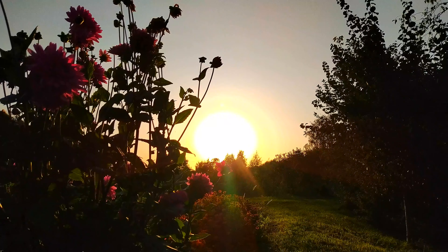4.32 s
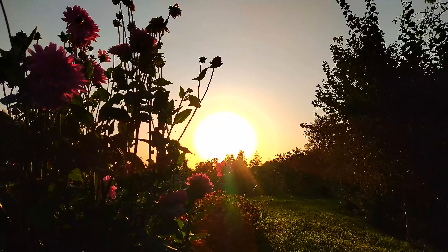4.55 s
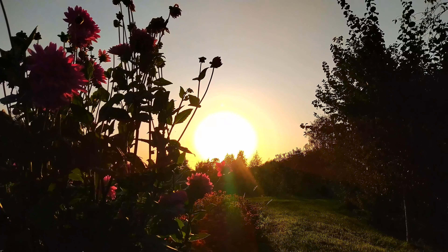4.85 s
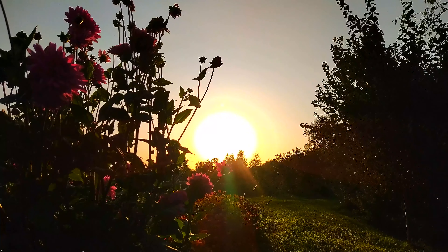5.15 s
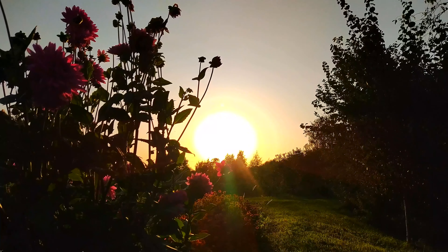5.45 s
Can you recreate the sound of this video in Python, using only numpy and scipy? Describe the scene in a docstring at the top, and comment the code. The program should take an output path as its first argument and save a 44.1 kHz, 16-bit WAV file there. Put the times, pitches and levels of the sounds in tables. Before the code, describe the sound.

A soft outdoor hiss and a faint low rumble run throughout in a garden. For the first second, a distant bird gives short, quiet fluting whistles that linger in the trees. A faint far trill follows from about 1.3 to 1.8 seconds. At 1.7 seconds a small songbird close to the microphone begins fast, high trills and chips, each louder than the last. From 2.5 seconds it sings loudly in quick repeated syllables of arched notes, gives two harsh zips near 3.4 seconds, and finishes with a falling flourish by 3.9 seconds, leaving a short echo. The rumble swells slightly around 3 seconds, then sinks deeper. Distant whistles return from 4.1 to 4.8 seconds, followed by faint trills and thin high calls, ending with a falling whistle near 5.6 seconds. Tiny dry ticks sound close by at about 1.2, 4.4 and 5 seconds.

```python
"""A garden, on one microphone close to a small songbird's perch. The bird sings one loud phrase:
swelling trills, quick repeated syllables of a few short arched notes each, and a flourish.
Other birds whistle and trill further off. Each voice is one gliding tone from the syrinx that the trees
scatter into a long tail. Faint ticks sound close by, over a low distant rumble and a soft hiss."""
import sys
import numpy as np
from scipy import signal
from scipy.fft import rfft, irfft
from scipy.io import wavfile

SR = 44100
rng = np.random.default_rng(int(sys.argv[2]) if len(sys.argv) > 2 else 0)


def file_out(sig):
    """Save sig as 16-bit WAV at sys.argv[1]."""
    # one column per channel
    cols = np.atleast_2d(sig).T
    # limit, then scale
    lim = np.clip(cols, -1, 1)
    pcm = np.round(lim * 32767).astype(np.int16)
    wavfile.write(sys.argv[1], SR, pcm)


N = 251811


def undb(db):
    """Decibels to gain."""
    return 10 ** (np.asarray(db) / 20)


def noise(points):
    """Noise of rms 1, its spectrum shaped by points of (frequency [Hz], level [dB])."""
    hz, db = np.transpose(points)
    bins = np.maximum(np.arange(N // 2 + 1) * SR / N, 1)
    shape = undb(np.interp(np.log(bins), np.log(hz), db))
    shaped = irfft(rfft(rng.standard_normal(N)) * shape, N)
    return shaped / np.sqrt(np.mean(shaped ** 2))


def walk(count, per_s):
    """Smooth random wander of spread near 1."""
    knots = rng.standard_normal(4096)
    return np.interp(np.arange(count) * per_s / SR, np.arange(len(knots)), knots)


def add(track, start, sound):
    """Mix a sound into the track at a time in seconds."""
    i = max(int(start * SR), 0)
    track[i:i + len(sound)] += sound[:N - i]


def swelling(peak_s, width_s):
    """Gain of a distant sound that grows and recedes; it is halved one width from its peak."""
    return 1 / (1 + ((np.arange(N) / SR - peak_s) / width_s) ** 2)


# Spectrum of the open air round the microphone: (frequency [Hz], relative level [dB])
AIR_SPECTRUM = [(20, -4.5), (40, -1.5), (75, 0.5), (120, -2.5), (180, -9), (300, -11.5), (480, -13.5),
                (700, -18.5), (1050, -20), (1500, -26), (3000, -26), (6000, -33), (11000, -34),
                (15800, -36.5)]

def background(air_db=-39, body_db=-37, depth_db=-44.5):
    """Steady outdoor air, and a distant rumble that swells once and then sinks deeper."""
    air = undb(air_db) * noise(AIR_SPECTRUM)
    body = noise([(30, -18), (80, .5), (130, -2), (260, -11.5), (500, -20), (1500, -73), (8000, -80)])
    body *= undb(body_db) * swelling(peak_s=2.89, width_s=.46)
    depth = noise([(18, -7.5), (32, 7), (60, 5), (100, -7), (300, -18), (8000, -90)])
    depth *= undb(depth_db) * swelling(peak_s=4.4, width_s=1.4)
    return air + body + depth


def syrinx(hz, gain, rasp, overtone_db=-45, throat_hz=11400, throat_width_hz=1000, throat_db=13):
    """A nearly pure tone whose pitch shivers; a high throat resonance lifts its weak overtones."""
    shiver = .005 * walk(len(hz), 407) + rasp * walk(len(hz), 2500)
    phase = 2 * np.pi * np.cumsum(hz * (1 + shiver)) / SR
    tone = np.sin(phase)
    for k in range(2, 5):
        throat = 1 + undb(throat_db) / (1 + ((k * hz - throat_hz) / throat_width_hz) ** 2)
        tone += undb(overtone_db) * throat * (k * hz < SR / 2) * np.sin(k * phase) * 2 / k
    soft_edges = signal.windows.tukey(len(hz), min(.0021 * SR / len(hz), 1))
    return np.sqrt(2) * gain * soft_edges * tone


def whistle(length, first_hz, last_hz, rasp, settle_s=.0597, flutter_db=3):
    """One note that glides fast, then settles; it flutters on its way through the leaves."""
    glide = 1 - np.exp(-np.arange(int(length * SR)) / SR / settle_s)
    hz = first_hz + (last_hz - first_hz) * glide / glide[-1]
    flutter = undb(flutter_db * walk(len(hz), 103.5))
    return syrinx(hz, signal.windows.tukey(len(hz), .4) * flutter, rasp)


# Whistles far off in the trees: (time [s], length [s], first pitch [Hz], last pitch [Hz], level [dB])
FAR_WHISTLES = [(0, 0.038, 2292, 2350, -37.5), (0.064, 0.022, 2270, 2730, -44),
                (0.076, 0.14, 2464, 1984, -43.5), (0.212, 0.037, 2780, 2360, -42.5),
                (0.331, 0.089, 2766, 2118, -42.5), (0.434, 0.05, 2200, 1750, -44),
                (0.709, .075, 2860, 2760, -49), (0.824, 0.12, 2848, 2587, -47.5),
                (0.909, 0.065, 2600, 2953, -44), (.975, 0.035, 2707, 2240, -42),
                (4.099, 0.061, 2846, 2790, -46), (4.189, 0.044, 2420, 2150, -39),
                (4.331, 0.044, 2134, 2433, -43.5), (4.436, .04, 2716, 2640, -42),
                (4.462, 0.022, 2530, 2120, -42.5), (4.491, 0.076, 2725, 2510, -43.5),
                (4.699, 0.054, 2780, 2480, -44), (4.731, 0.1, 2393, 2347, -44)]

def far_whistles():
    """A distant bird's short, fluting glides."""
    track = np.zeros(N)
    for start, length, first_hz, last_hz, db in FAR_WHISTLES:
        add(track, start, undb(db) * whistle(length, first_hz, last_hz, rasp=.028))
    return track


def trees(sound, t60, build_s, hold_s, treble_db, patchy_db):
    """Echoes from leaves and trunks: they build up, hold while the nearby trees answer, then die away."""
    t = np.arange(int(1.5 * SR)) / SR
    envelope = (1 - np.exp(-t / build_s)) * undb(-60 * np.maximum(t - hold_s, 0) / t60)
    echoes = rng.standard_normal(len(t)) * envelope * undb(patchy_db * walk(len(t), 299))
    echoes /= np.sqrt(np.sum(echoes ** 2))
    # leaves scatter short waves differently from long ones
    colour = undb(np.interp(np.fft.rfftfreq(len(t), 1 / SR), [3500, 6000], [0, treble_db]))
    return signal.fftconvolve(sound, irfft(rfft(echoes) * colour))[:N]


# Faint ticks close to the microphone: (time [s], relative level [dB])
NEAR_TICKS = [(1.166, -30), (4.406, -27.5), (4.95, -32)]

def ticks(decay_s=.0019):
    """Tiny dry bursts of bright noise that die at once."""
    track = np.zeros(N)
    t = np.arange(SR // 50) / SR
    for start, db in NEAR_TICKS:
        bright = noise([(2000, -20), (7000, -6), (12000, 3), (16000, -2)])[:len(t)]
        add(track, start, undb(db) / 2 * np.exp(-t / decay_s) * bright)
    return track


def trill(length, top_hz, dip_hz, dips_per_s, swell, rasp, dip_width=.19, dip_db=-5):
    """A held note whose pitch dips once a cycle; the dips are deepest in mid-note."""
    progress = np.linspace(0, 1, int(length * SR))
    cycles_from_dip = (progress * length * dips_per_s - .92 + .5) % 1 - .5
    dip = np.exp(-(cycles_from_dip / dip_width) ** 2)
    effort = np.interp(progress, [0, .45, .82, 1], [.3, 1, .98, .385])
    loudness = np.minimum(progress / swell, 1) * np.interp(progress, [.9, 1], [1, .5])
    return syrinx(top_hz - dip_hz * dip * effort, loudness * undb(dip_db * dip), rasp)


# Trills far from the microphone: (time [s], length [s], top pitch [Hz], dip [Hz], dip rate [1/s],
# relative level [dB], swell [share of length])
FAR_TRILLS = [(1.25, .58, 4270, 1180, 38, -54.5, .55), (4.658, .14, 5100, 495, 30, -61.5, .18),
              (4.962, .46, 4540, 950, 25, -56.5, .11)]

def far_trills():
    """Distant trills, loudest at the bottom of each dip in pitch."""
    track = np.zeros(N)
    for start, length, top_hz, dip_hz, dips_per_s, db, swell in FAR_TRILLS:
        call = trill(length, top_hz, dip_hz, dips_per_s, swell, rasp=.052, dip_width=.26, dip_db=7.5)
        add(track, start, undb(db) * call)
    return track


# A smaller bird, also far off: (time [s], length [s], first pitch [Hz], last pitch [Hz], level [dB])
FAR_SEEPS = [(1.398, 0.024, 7550, 7300, -57), (4.873, 0.16, 6300, 6400, -59.5),
             (5.407, .067, 7850, 8500, -58.5), (5.57, 0.086, 5410, 4370, -44)]

def far_seeps():
    """Thin, high whistles, each one glide."""
    track = np.zeros(N)
    for start, length, first_hz, last_hz, db in FAR_SEEPS:
        add(track, start, undb(db) * whistle(length, first_hz, last_hz, rasp=.024))
    return track


# Trills from the near perch: (time [s], length [s], dip [Hz], level [dB], swell [share of length])
OPENING_TRILLS = [(1.735, .1, 650, -43, .55), (1.918, .086, 1050, -29.5, .42),
                  (2.1185, .087, 1250, -21.5, .36), (2.3245, .083, 1100, -17.5, .08)]

def opening_trills(first_top_hz=4944, fall_hz=133, dips_per_s=60.5):
    """The near bird opens with fast trills, each lower and louder than the last."""
    track = np.zeros(N)
    for k, (start, length, dip_hz, db, swell) in enumerate(OPENING_TRILLS):
        top_hz = first_top_hz - k * fall_hz
        add(track, start, undb(db) * trill(length, top_hz, dip_hz, dips_per_s, swell, rasp=.019))
    return track


def arched_note(length, first_hz, middle_hz, last_hz, rasp, best_hz=3314, quaver_db=2):
    """One glide that swells and fades unevenly; it weakens as it leaves the voice's best pitch."""
    progress = np.linspace(0, 1, int(length * SR))
    hz = np.polyval(np.polyfit([0, .5, 1], [first_hz, middle_hz, last_hz], 2), progress)
    octaves = np.log2(hz / best_hz)
    range_db = np.where(octaves < 0, -16, -12.5) * octaves ** 2
    quaver = undb(quaver_db * walk(len(hz), 324))
    envelope = np.interp(progress, [0, .53, 1], undb([-13, 0, -11.5]))
    overtone_db = -49 + 161 * rasp  # harsher notes carry more overtones
    return syrinx(hz, envelope * undb(range_db) * quaver, rasp, overtone_db)


# The notes of each of the near bird's syllables: (time into syllable [s], length [s], first pitch [Hz],
# middle pitch [Hz], last pitch [Hz], relative level [dB])
CHIP = [(0, 0.0141, 5480, 5670, 6050, -2.5), (0.014, 0.0106, 2335, 3270, 4800, -6.5),
        (0.026, .013, 5040, 5610, 5800, -1.5)]
SWOOP = [(0, 0.0134, 3900, 4190, 4500, -7), (.015, .018, 2510, 3540, 3600, -5.5),
         (.042, .037, 3778, 3150, 1945, -2.5), (.079, .016, 2300, 3000, 2200, -4),
         (.112, 0.0172, 2804, 3480, 3330, -1.5)]
ARCH = [(0, 0.01147, 5370, 3960, 3550, -5.5), (.021, .032, 2055, 3410, 4070, -2.5),
        (.05, .03, 4153, 2800, 2300, -4)]
CHEW = [(0, .021, 2890, 2940, 1530, 1.5), (.024, 0.0253, 1760, 2178, 1480, -2)]
HOLD = [(0, 0.0092, 3400, 5200, 6640, -5), (0.008, 0.053, 5650, 5556, 5500, 6),
        (.07, .06, 5700, 5625, 5580, 3.5)]  # sung by the second side of the syrinx
ZIP = [(0, .009, 3460, 4910, 6100, -9), (0.017, .027, 4880, 4317, 4090, 1.5)]
DROP = [(0, .019, 3000, 2900, 2100, -2), (.02, .025, 2850, 2500, 1800, 0)]
RISE = [(0, .025, 1750, 1950, 2450, -6), (.022, .022, 2400, 3200, 3850, -.5)]
FLOURISH = [(0, .024, 3950, 4200, 4800, -3.5), (.022, .025, 4600, 3550, 2750, 2),
            (.048, .028, 2750, 2650, 2050, -1.5), (.068, .07, 2350, 2050, 1920, -5.5)]
# The phrase from the near perch: (time [s], level [dB], rasp [share of pitch], syllable)
SONG = [(1.864, -30.5, 0.091, CHIP), (2.062, -24.5, 0.076, CHIP), (2.268, -23, 0.094, CHIP),
        (2.464, -13, 0.012, SWOOP), (2.649, -12.5, .014, SWOOP), (2.828, -11.5, 0.016, ARCH),
        (2.949, -11, 0.016, ARCH), (3.071, -11.5, 0.018, ARCH), (3.191, -16, .015, CHEW),
        (3.271, -16, 0.044, CHEW), (3.369, -28, .018, HOLD), (3.379, -17.5, .095, ZIP),
        (3.457, -16.5, 0.092, ZIP), (3.537, -13.5, .012, DROP), (3.599, -13.5, 0.015, RISE),
        (3.707, -14, 0.042, FLOURISH)]

def syllables():
    """The near bird strings arched notes into quick repeated syllables and a closing flourish."""
    track = np.zeros(N)
    for start, db, rasp, syllable in SONG:
        for after, length, first_hz, middle_hz, last_hz, note_db in syllable:
            note = arched_note(length, first_hz, middle_hz, last_hz, rasp)
            add(track, start + after, undb(db + note_db) * note)
    return track


def churr(start_s=3.405, length_s=.083, pitch_hz=4600, level_db=-26):
    """A harsh rattle that joins the near bird's two zips: one tone with a strong shiver in pitch."""
    track = np.zeros(N)
    hz = np.full(int(length_s * SR), pitch_hz)
    envelope = undb(level_db) * signal.windows.tukey(len(hz), .5)
    add(track, start_s, syrinx(hz, envelope, rasp=.16, overtone_db=-47))
    return track


def scene():
    """The garden in one channel: the near bird mostly direct, the far ones largely by way of the trees."""
    voice = churr() + opening_trills() + syllables()  # all from one perch
    twigs = trees(voice, t60=.13, build_s=.0087, hold_s=.0045, treble_db=8, patchy_db=9.5)
    garden = trees(voice, t60=1, build_s=.0036, hold_s=.093, treble_db=3, patchy_db=0)
    near_bird = voice + undb(-7) * twigs + undb(-3) * garden
    whistles = far_whistles() + far_seeps()
    trills = far_trills()
    into_trees = undb(-1) * whistles + trills
    far_tail = trees(into_trees, t60=1.85, build_s=.006, hold_s=.039, treble_db=-.5, patchy_db=1)
    far_birds = whistles + undb(-3.5) * trills + far_tail
    return (near_bird + far_birds + ticks() + background())[None]


def record(dry, top_hz=15800):
    """The recorder cuts the highest treble steeply."""
    return signal.sosfilt(signal.ellip(10, .2, 80, top_hz, fs=SR, output="sos"), dry)


dry = scene()
out = record(dry)
file_out(out)
```